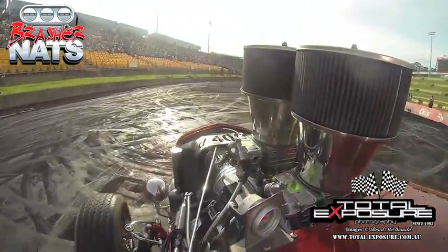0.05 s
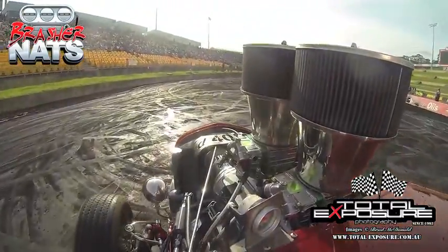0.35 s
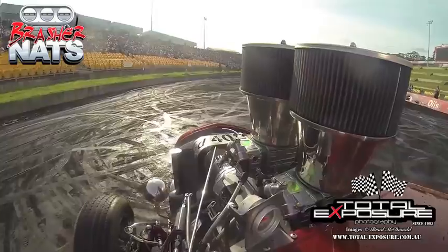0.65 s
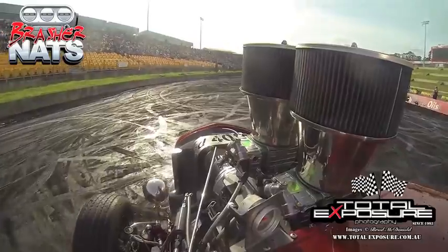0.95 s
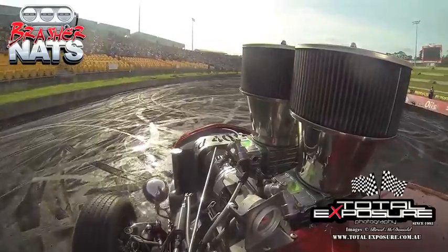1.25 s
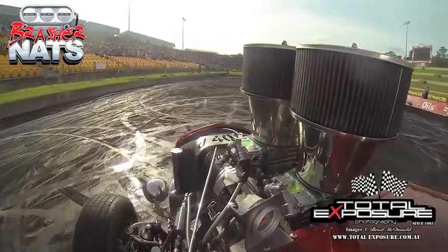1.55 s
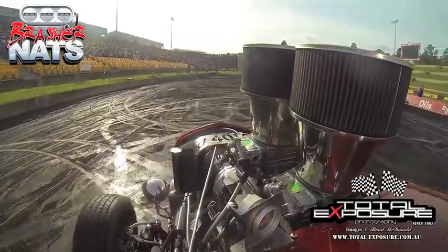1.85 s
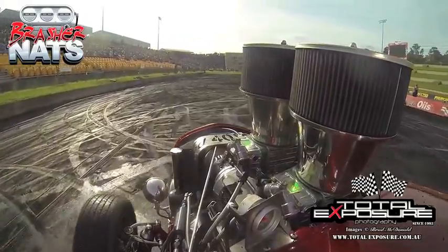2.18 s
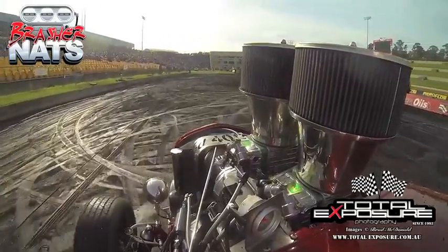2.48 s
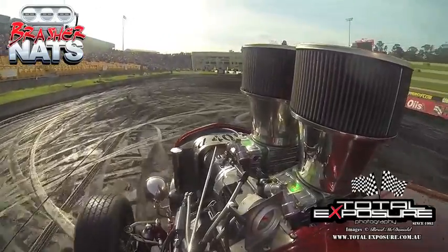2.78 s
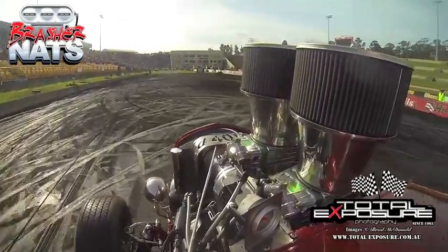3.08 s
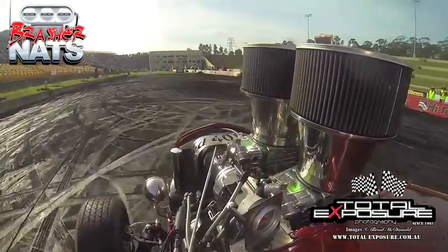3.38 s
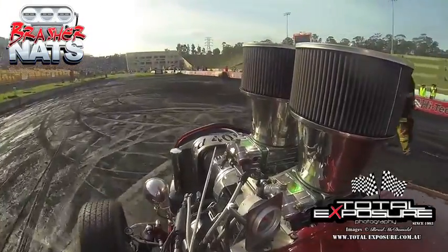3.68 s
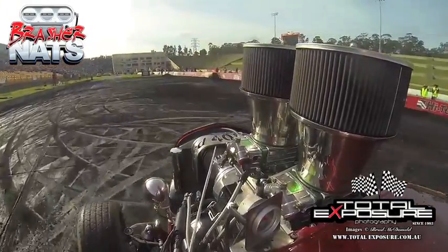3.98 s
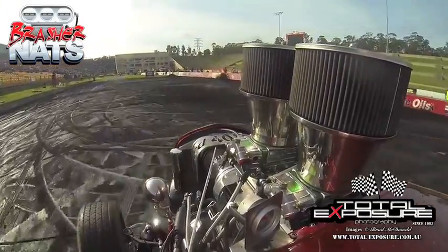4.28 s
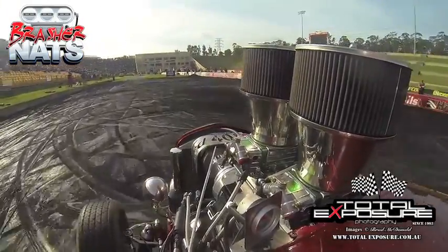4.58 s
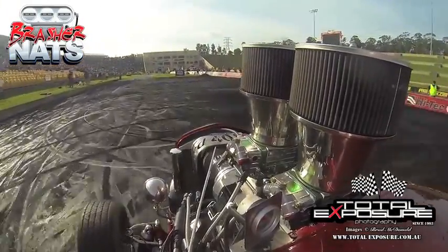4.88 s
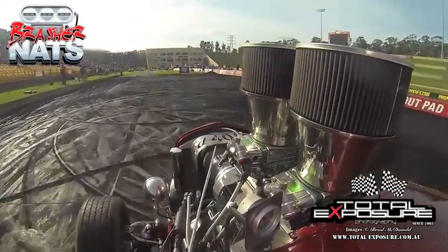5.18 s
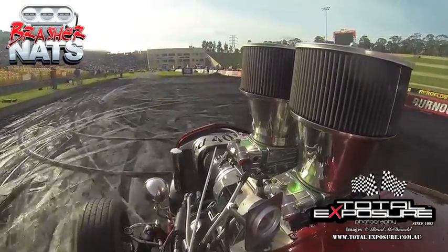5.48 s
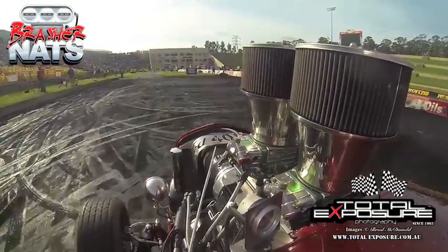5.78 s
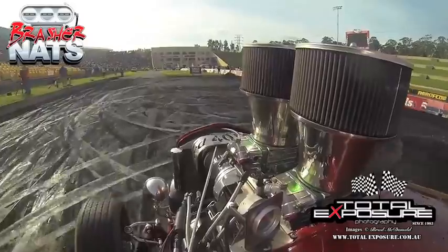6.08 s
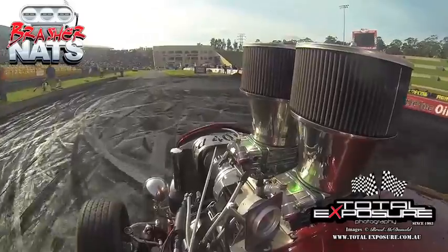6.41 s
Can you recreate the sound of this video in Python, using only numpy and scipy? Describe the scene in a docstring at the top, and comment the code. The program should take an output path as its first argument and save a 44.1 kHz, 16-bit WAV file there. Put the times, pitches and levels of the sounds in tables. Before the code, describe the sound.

A supercharged V8 drones low and muffled from on board a hot rod, under constant hollow knocking and rattling of the camera mount.

```python
"""A burnout pad, heard from a camera microphone in a closed housing on a sliding V8 hot rod.
The car's body booms and the camera sways on its arm. The housing muffles the exhaust to a low drone,
with a supercharger whine at peak revs. Right at the microphone the shaking makes the mount chatter:
hollow knocks that ring the housing, with a fine plastic crackle and clacking fittings."""
import sys
import numpy as np
from scipy import signal
from scipy.fft import rfft, irfft, next_fast_len
from scipy.io import wavfile

SR = 44100
rng = np.random.default_rng(int(sys.argv[2]) if len(sys.argv) > 2 else 0)


def file_out(sig):
    """Save sig as 16-bit WAV at sys.argv[1]."""
    # one column per channel
    cols = np.atleast_2d(sig).T
    # limit, then scale
    lim = np.clip(cols, -1, 1)
    pcm = np.round(lim * 32767).astype(np.int16)
    wavfile.write(sys.argv[1], SR, pcm)


N = 284445

# The throttle is held open in the middle and lifted twice near the end; the mount shakes with it.
# Each source adds its own trim: time_s, exhaust_db, chatter_db, crackle_db
THROTTLE = [(0, -38, -43, -54), (.42, -42, -47.5, -57.5), (1.22, -32, -39, -50), (1.4, -36.5, -40.5, -52.5),
            (2.3, -35.5, -38.5, -51), (2.6, -28, -27.5, -44.5), (2.98, -34, -34.5, -49.5),
            (3.1, -28, -32, -45), (3.62, -34.5, -35.5, -46.5), (3.86, -30, -29, -40), (4.1, -31, -35, -45),
            (4.62, -31, -29, -42.5), (4.96, -40, -54.5, -60.5), (5.27, -38.5, -65, -62.5),
            (5.295, -37.5, -40, -50), (5.57, -35.5, -40.5, -52.5), (5.72, -39.5, -55.5, -61),
            (5.88, -42.5, -54.5, -61), (6.2, -34, -38.5, -49.5), (6.45, -41.5, -53.5, -58.5)]
# hard knocks of the mount, before trim: start_s, peak_db, ring_hz
KNOCKS = [(0.1643, -26, 1335), (0.219, -25.5, 1365), (0.291, -25.5, 1436), (0.3541, -27.5, 1492),
          (0.549, -31.5, 1340), (0.4187, -28.5, 1400), (0.4585, -28, 1400), (0.6231, -27, 1352),
          (0.6722, -24.0, 1390), (0.7008, -25, 1340), (0.728, -24.5, 1350), (0.784, -29.5, 1270),
          (0.8045, -24.5, 1410), (0.872, -36, 1280), (0.908, -26.5, 1496), (0.9305, -29, 1360),
          (0.965, -29.5, 1360), (0.997, -27.5, 1358), (1.019, -26.5, 1366), (1.0457, -28, 1326),
          (1.0666, -27.5, 1380), (1.0958, -27.5, 1400), (1.123, -26.5, 1406), (1.142, -28, 1450),
          (1.1695, -26.5, 1360), (1.1988, -22, 1364), (1.2271, -27, 1440), (1.2976, -28.5, 1420),
          (1.3104, -25.5, 1400), (1.332, -27, 1410), (1.363, -32.5, 1294), (1.4192, -28, 1370),
          (1.4521, -31, 1366), (1.4731, -25.5, 1450), (1.5765, -28, 1420), (1.6036, -27, 1340),
          (1.6348, -27, 1447), (1.652, -30, 1348), (1.6824, -27, 1340), (1.711, -28, 1401),
          (1.7327, -29.5, 1380), (1.7636, -25.5, 1270), (1.7906, -28, 1416), (1.8123, -26.5, 1340),
          (1.891, -26.5, 1400), (1.9188, -25.5, 1341), (1.9398, -23.5, 1376), (1.969, -24.5, 1370),
          (1.997, -28, 1370), (2.074, -26, 1326), (2.0938, -23.5, 1460), (2.1227, -22.5, 1391),
          (2.15, -20.5, 1345), (2.168, -23.5, 1280), (2.1789, -25.5, 1450), (2.2256, -23.5, 1382),
          (2.32, -33, 1370), (2.3595, -25.5, 1347), (2.3732, -22, 1405), (2.391, -23, 1350),
          (2.4128, -18, 1311), (2.5058, -21.5, 1330), (2.5215, -22, 1430), (2.546, -19.5, 1360),
          (2.5548, -22, 1311), (2.5695, -19, 1380), (2.585, -18, 1319), (2.5922, -19.5, 1354),
          (2.622, -19.5, 1340), (2.6306, -17.5, 1305), (2.668, -18.5, 1350), (2.704, -22, 1340),
          (2.735, -13.5, 1377), (2.7505, -15.5, 1403), (2.774, -15, 1342), (2.7837, -15.5, 1336),
          (2.8241, -17.5, 1330), (2.8532, -13.5, 1340), (2.861, -26, 1340), (2.9104, -20.5, 1353),
          (2.919, -22, 1340), (2.9342, -23, 1340), (2.994, -21.5, 1386), (3.004, -23, 1293),
          (3.021, -18.5, 1348), (3.0645, -22.5, 1404), (3.0906, -17.5, 1330), (3.106, -18.5, 1340),
          (3.1161, -19.5, 1290), (3.1482, -17.5, 1412), (3.1635, -20, 1371), (3.189, -19.5, 1329),
          (3.202, -27.5, 1310), (3.2493, -16, 1365), (3.2602, -20, 1340), (3.276, -14.0, 1335),
          (3.2883, -21.5, 1360), (3.3462, -22, 1340), (3.3635, -19, 1340), (3.422, -20.5, 1380),
          (3.4308, -28, 1358), (3.45, -14, 1350), (3.4595, -16.5, 1358), (3.5381, -22, 1325),
          (3.629, -26, 1310), (3.677, -26, 1289), (3.722, -25, 1290), (3.734, -21.5, 1278),
          (3.752, -22, 1262), (3.7689, -21, 1340), (3.8167, -21.0, 1297), (3.8318, -22.5, 1327),
          (3.846, -24, 1285), (3.913, -19.5, 1270), (3.924, -20.5, 1285), (3.962, -23.5, 1332),
          (3.9913, -27, 1320), (4.01, -19.5, 1315), (4.059, -27, 1322), (4.108, -24.5, 1330),
          (4.139, -25, 1407), (4.1699, -24, 1297), (4.2046, -22, 1307), (4.2533, -23, 1382),
          (4.303, -22.5, 1247), (4.3157, -30, 1380), (4.3496, -21.5, 1308), (4.3956, -23, 1330),
          (4.441, -24, 1310), (4.483, -18.5, 1276), (4.5288, -20, 1316), (4.5396, -18.5, 1321),
          (4.5709, -28, 1302), (4.5821, -16, 1273), (4.614, -20, 1311), (4.6243, -21.5, 1343),
          (4.6564, -21, 1283), (4.8149, -26, 1415), (5.2882, -25, 1420), (5.302, -27.5, 1374),
          (5.329, -33, 1329), (5.407, -28, 1330), (5.456, -28, 1414), (5.4683, -25, 1370),
          (5.4902, -25.5, 1362), (5.512, -29, 1290), (5.5451, -26, 1323), (5.582, -28.5, 1340),
          (5.8835, -33, 1369), (5.926, -28.5, 1424), (5.9506, -29.5, 1310), (6.1442, -29.5, 1340),
          (6.163, -29, 1396), (6.1911, -25.5, 1295), (6.216, -26.5, 1334), (6.247, -28, 1350),
          (6.367, -29.5, 1282), (6.3962, -30, 1340)]
# resonances of the housing round the microphone: pitch_hz, width_hz, level_db
HOUSING_MODES = [(540, 930, -28.5), (650, 83, -27.5), (1340, 240, 15.5), (1450, 24, -14.5),
                 (2506, 86, -23.5), (2742, 100, -25.5), (4870, 680, -37)]


def undb(db):
    """Decibels to gain."""
    return 10 ** (np.asarray(db) / 20)


def unit(x):
    """Scale to rms 1."""
    return x / np.sqrt(np.mean(np.abs(x) ** 2))


def curves(table):
    """The columns of a timed table, one value a sample."""
    time_s, *columns = np.transpose(table)
    return [np.interp(np.arange(N) / SR, time_s, column) for column in columns]


def colour(x, outline):
    """Minimum-phase filter with the given outline: frequency_hz, gain_db."""
    hz, db = np.transpose(outline)
    size = next_fast_len(2 * N)
    f = np.maximum(np.fft.rfftfreq(size, 1 / SR), 1)
    gain = undb(np.interp(np.log(f), np.log(hz), db))
    cepstrum = irfft(np.log(gain), size)
    cepstrum[1:size // 2] *= 2
    cepstrum[size // 2 + 1:] = 0
    return irfft(rfft(x, size) * np.exp(rfft(cepstrum)), size)[:N]


def walk(rate_hz, size=8192):
    """Smooth random drift with spread 1, rolling off above the given rate."""
    f = np.fft.rfftfreq(size, N / SR / size)
    slow = irfft(rfft(rng.standard_normal(size)) / (1 + (f / rate_hz) ** 4))
    return np.interp(np.linspace(0, size - 1, N), np.arange(size), unit(slow))


def impulses(times, sizes):
    """One click of the given size at each time."""
    return np.bincount(np.clip(np.asarray(times) * SR, 0, N - 1).astype(int), sizes, N)


def fade(x, decay_s):
    """Let each click die away exponentially."""
    return signal.lfilter([1], [1, -np.exp(-1 / (decay_s * SR))], x)


def contacts(count, spread_db):
    """Randomly timed small contacts of uneven size."""
    when, size = rng.random((count, 2)).T
    return impulses((np.arange(count) + 2 * when) / count * N / SR, undb(-spread_db * size))


def swing(hz, rough, rate_hz):
    """A resonance kept swinging by uneven pushes: size and phase wander."""
    wander = 1 + rough * (walk(rate_hz) + 1j * walk(rate_hz))
    phase = 2 * np.pi * np.cumsum(hz * np.ones(N)) / SR
    return unit(np.real(wander * np.exp(1j * phase)))


def body(cycles, boom_trim_db=-1, rumble_db=-24, sway_trim_db=-3):
    """The body booms, throbbing once an engine cycle, over road rumble; the camera sways on its arm."""
    # main resonance of the body: time_s, pitch_hz, level_db, throb_depth (0-1)
    resonance = [(0, 78.1, -20.5, 0.13), (.2, 78.96, -23.5, .6), (.28, 79.9, -11, 0),
                 (.52, 78.96, -16.5, 0.46), (.7, 76.42, -18, 0.45), (1.0, 82.51, -16, 0.72),
                 (1.26, 73.44, -22.5, 1), (1.36, 91.94, -15, 0), (1.52, 92.4, -16.5, 0.58),
                 (1.64, 77.6, -16.5, 0.4), (1.92, 80.34, -21, 1), (2.35, 79.85, -15.5, 0.72),
                 (2.54, 84.2, -23.5, 0.58), (2.66, 79.08, -17, 0.59), (3.72, 79, -17, 0.31),
                 (3.86, 78.16, -21.5, 0.99), (4.75, 80, -29, 0.54), (5.02, 87.04, -17, .3),
                 (5.17, 70.1, -13.5, .15), (5.55, 87.66, -17.5, 0.32), (5.7, 86, -18.5, 0.54),
                 (5.86, 74.86, -15, .2), (6.45, 78, -19.5, 0.83)]
    # swaying of the camera: time_s, level_db
    sway_levels = [(0.0, -13), (0.58, -27.5), (1.26, -15), (1.5, -27), (1.64, -18.5), (1.76, -22.5),
                   (1.96, -12), (2.08, -19.5), (2.58, -15.5), (2.68, -18.5), (3.4, -22), (4.78, -10.5),
                   (5.1, -23), (5.78, -14), (6.0, -29), (6.45, -13.5)]
    # tone of the steady road rumble: frequency_hz, gain_db
    rumble_tone = [(10, -28), (30, -26), (45, -4.5), (62, 5.5), (100, 6.5), (118, 0), (150, -12),
                   (250, -19), (600, -67), (4000, -100)]
    boom_hz, boom_db, throb = curves(resonance)
    boom = swing(boom_hz, rough=.25, rate_hz=18) * undb(boom_db + boom_trim_db)
    boom *= 1 + throb * np.cos(2 * np.pi * cycles)
    sway = swing(hz=28.5, rough=1, rate_hz=9.8) * undb(curves(sway_levels)[0] + sway_trim_db)
    rumble = unit(colour(rng.standard_normal(N), rumble_tone)) * undb(rumble_db)
    return boom + rumble + sway


def firings(cycles, cylinders=8):
    """Time and cylinder of every firing: each cylinder fires once a four-stroke cycle."""
    number = np.floor(cycles * cylinders).astype(int)
    at = np.flatnonzero(np.diff(number))
    return at / SR, number[at] % cylinders


def exhaust(times, cylinder, bank_lag_s=.0011, jitter_s=.00025, scatter_db=6, gas_db=-2, trim_db=-2):
    """Uneven firings from two banks, each with a puff of gas, dulled by the housing."""
    # strength of the eight firings of a cycle: level_db
    firing_db = [1.5, 4, 1, -16.5, 5.5, -1.5, 1, 3]
    # side of each firing: bank (1 is the far one, with longer pipes)
    banks = [0, 1, 1, 0, 1, 0, 0, 1]
    # the exhaust from inside the housing: frequency_hz, gain_db
    muffled = [(60, -27.5), (120, -10.5), (150, -2), (180, 1), (240, -8.5), (290, -7.5), (340, -4),
               (420, -14), (560, -10.5), (640, -16), (710, -14.5), (820, -34.5), (1100, -32.5),
               (2000, -31.5), (5000, -62), (14000, -84)]
    late, size = rng.standard_normal((N // 100, 2))[:len(times)].T
    arrival_s = times + bank_lag_s * np.take(banks, cylinder) + jitter_s * late
    pulses = impulses(arrival_s, undb(np.take(firing_db, cylinder) + scatter_db * np.minimum(size, 1)))
    gas = fade(pulses, decay_s=.006) * rng.standard_normal(N)
    thuds = unit(colour(pulses - pulses.mean(), muffled))
    puffs = undb(gas_db) * unit(colour(gas, muffled))
    return unit(thuds + puffs) * undb(curves(THROTTLE)[0] + trim_db)


def drone(cycles, cycle_hz, restless, waver_db=3.5, trim_db=-.5, rough=1.41):
    """Engine orders come through the chassis, swell in its resonances and growl at restless revs."""
    # engine orders: cycle_multiple, level_db
    orders = [(2, -4), (3, -5), (4, -8), (5, -8), (6, -14), (8, -26), (9, -22), (10, -24), (13, -19),
              (14, -26), (15, -28), (16, -21), (18, -28), (28, -30), (35, -31)]
    # chassis resonances: centre_hz, width_hz, lift_db
    chassis = [(104.7, 7.6, 19), (320, 45, 8)]
    tones = 0
    for k, db in orders:
        lift_db = sum(lift * np.exp(-((k * cycle_hz - hz) / width) ** 2) for hz, width, lift in chassis)
        phase = 2 * np.pi * (k * cycles + rng.random()) + rough * restless ** 2 * walk(32)
        tones += undb(db + lift_db + waver_db * walk(6.2)) * np.sin(phase)
    return tones * undb(curves(THROTTLE)[0] + trim_db)


def supercharger(cycles, waver_db=2, rough=.31):
    """The supercharger whines on high multiples of the cycle rate, arching with the revs."""
    # tones of the whine: cycle_multiple, level_db
    orders = [(40, -11), (45, -9), (50, -7), (53, -2), (57, 0), (59, -5), (62, -7)]
    # its swell at peak revs: time_s, level_db
    swell = [(2.3, -70), (3.7, -47), (4.35, -46), (4.58, -32.5), (4.8, -40), (5.1, -70)]
    tones = 0
    for k, db in orders:
        gain = undb(db + waver_db * walk(9))
        phase = 2 * np.pi * (k * cycles + rng.random()) + rough * walk(25)
        tones += gain * np.sin(phase)
    return unit(tones) * undb(curves(swell)[0])


def jolts(times, cylinder, scatter_db=4, slack_s=.00016):
    """The firings throw the loose mount against its stop in a limping pattern, cycle after cycle."""
    # push of each of the eight firings: level_db
    jolt_db = [0, -10, -6, -2, -11, -1, -9, -4]
    late, size = rng.standard_normal((N // 100, 2))[:len(times)].T
    level_db = np.take(jolt_db, cylinder) + scatter_db * np.minimum(size, 1)
    return impulses(times + slack_s * late, undb(level_db))


def free_flight(before_s=.01, after_s=.0038, dip_db=-12):
    """Before a hard knock the mount flies free of its stop: a gain that dips until just after it."""
    knock_s = np.transpose(KNOCKS)[0]
    t = np.arange(N) / SR
    nearest = np.searchsorted((knock_s[1:] + knock_s[:-1]) / 2, t)
    since_s = t - knock_s[nearest]
    width_s = np.where(since_s < 0, before_s, after_s)
    return undb(dip_db * np.exp(-(since_s / width_s) ** 2))


def tinkle(strikes, scrape_s=.0018, ring_s=.002):
    """Small metal parts are scraped briefly by each strike and ring, a little differently every time."""
    # modes of the loose fittings: pitch_hz, level_db
    modes = [(1900, -8), (2500, -9.5), (2730, -11), (3180, -3), (4100, -14), (5260, -9), (7550, -14),
             (8300, -19), (10900, -25)]
    push = fade(strikes, scrape_s) * rng.standard_normal(N) * np.sqrt(2 / (scrape_s * SR))
    ringing = 0
    for hz, db in modes:
        pole = np.exp((2j * np.pi * hz - 1 / ring_s) / SR)
        ringing += undb(db) * signal.lfilter([pole.imag], [1, -2 * pole.real, abs(pole) ** 2], push)
    return ringing


def fittings(crack_db=-3, crack_s=.0046, ring_db=-8, shaken_db=-22, stray_db=-1):
    """Loose fittings clack on the housing and ring; knocks and stray contacts make them tinkle."""
    # clacks on the housing: start_s, strength_db
    hits = [(0.0724, -42), (0.092, -42), (0.2186, -33.5), (0.253, -40), (0.2794, -41.5), (0.308, -47.5),
            (0.349, -45), (0.3834, -42), (0.4587, -42), (0.4864, -41.5), (0.652, -40), (0.75, -37.5),
            (0.8984, -43), (0.9198, -41.5), (1.1049, -47), (1.2638, -36.5), (1.474, -41), (1.6534, -39),
            (1.7598, -38.5), (1.9878, -46), (2.228, -38), (2.2535, -34.5), (2.749, -40), (2.87, -36),
            (3.0488, -38), (3.1744, -36), (3.2988, -40), (3.4873, -33.5), (3.4948, -34), (3.7713, -35),
            (4.0354, -31), (4.3206, -38), (5.001, -45.5), (5.0362, -42.5), (5.1251, -44), (5.1443, -41),
            (5.2483, -44.5), (5.3274, -35.5), (5.3687, -38.5), (5.7179, -42), (5.7354, -38.5),
            (5.7523, -44), (5.8483, -48), (5.8677, -46), (5.8879, -38.5), (5.9561, -38.5), (6.0664, -41),
            (6.2234, -41), (6.2558, -36.5), (6.3365, -37)]
    # tone of their dry crack: frequency_hz, gain_db
    crack_tone = [(500, -7), (1800, 2.5), (2400, -7), (3400, -6), (6300, -17), (7500, -23.5), (13000, -36)]
    clack_s, clack_db = np.transpose(hits)
    clacks = impulses(clack_s, undb(clack_db))
    noise = rng.standard_normal(N)
    contact = signal.oaconvolve(clacks, np.hanning(int(crack_s * SR)))[:N]
    cracks = colour(contact * noise, crack_tone) / np.std(colour(noise, crack_tone))
    knock_s, knock_db, _ = np.transpose(KNOCKS)
    shaken = impulses(knock_s + .002, undb(knock_db + shaken_db))
    stray = contacts(count=500, spread_db=13) * undb(curves(THROTTLE)[2] + stray_db)
    return undb(crack_db) * cracks + tinkle(undb(ring_db) * clacks + shaken + stray)


def crackle(taps, trim_db=2, grit_db=-7, hiss_db=-13, rasp_db=-35, rasp_growth=.52, dull_hz=8000):
    """Plastic rasps dully at every tap and knock, with fine bright grit in between."""
    # tone of the rubbing plastic: frequency_hz, gain_db
    plastic = [(300, -16.5), (800, 4), (1050, 6.5), (1550, 11), (1750, -3.5), (2150, -5.5), (2500, 1.5),
               (2900, -6.5), (3150, -6), (4400, -10.5), (5300, -7.5), (6200, -12), (7800, -15.5),
               (13300, -25), (15000, -42.5)]
    shaking = undb(curves(THROTTLE)[2] + trim_db)
    tap_rasp = (unit(fade(taps, decay_s=.013)) + undb(hiss_db)) * shaking
    knock_s, knock_db, _ = np.transpose(KNOCKS)
    blows = impulses(knock_s + .00078, undb(rasp_growth * knock_db + rasp_db))
    knock_rasp = fade(blows, decay_s=.014)
    grains = unit(fade(contacts(count=520, spread_db=24), decay_s=.0008))
    rasp_noise, grit_noise = rng.standard_normal((2, N))
    rasp = signal.lfilter(*signal.butter(1, dull_hz, fs=SR), np.hypot(tap_rasp, knock_rasp) * rasp_noise)
    grit = undb(grit_db) * grains * shaking * grit_noise
    return colour(rasp + grit, plastic) / np.std(colour(rasp_noise, plastic))


def housing_ring(ring_hz, weights_db=0, contact_s=.0053, unshifted_hz=1340):
    """One soft-edged blow on the housing, peak 1; where it lands shifts and weights the resonances."""
    hz, width_hz, db = np.transpose(HOUSING_MODES)
    t = np.arange(SR // 25) / SR
    decays = np.exp(-np.pi * np.outer(width_hz, t))
    modes = decays * np.sin(2 * np.pi * np.outer(hz * ring_hz / unshifted_hz, t))
    onset = 1 - np.exp(-(t / contact_s) ** 2)
    sound = (width_hz * undb(db + weights_db)) @ modes * onset
    return sound / np.abs(sound).max()


def chatter(taps, trim_db=-5, centre_hz=1360, spread_hz=110, pivot_db=-37, spots_per_db=.13, spots=5):
    """Taps strike and scrape a few spots on the housing, ringing higher when the chatter is lighter."""
    chatter_db = curves(THROTTLE)[1]
    shift = spots_per_db * (pivot_db - chatter_db)
    spot = np.clip(np.floor(spots * rng.random(N) + shift), 0, spots - 1)
    ringing = 0
    for k, ring_hz in enumerate(centre_hz + spread_hz * np.linspace(-1, 1, spots)):
        blows = taps * (spot == k)
        scrapes = .03 * fade(blows, decay_s=.003) * rng.standard_normal(N)
        ringing += signal.oaconvolve(blows + scrapes, housing_ring(ring_hz))[:N]
    return unit(ringing) * undb(chatter_db + trim_db)


def knocks(trim_db=-.4, rebound_db=-16, rebound_s=.0097, return_db=-16, return_s=.0095, vary_db=3):
    """Each hard knock rings the housing a little differently, rebounds and strikes again lightly."""
    track = np.zeros(N + SR)
    for start_s, peak_db, ring_hz in KNOCKS:
        bounce_s = rebound_s * np.exp(.37 * rng.standard_normal())
        weights_db = vary_db * rng.standard_normal(len(HOUSING_MODES))
        knock = undb(peak_db + trim_db) * housing_ring(ring_hz, weights_db)
        for delay_s, db in ((0, 0), (bounce_s, rebound_db), (return_s, return_db)):
            track[int((start_s + delay_s) * SR):][:len(knock)] += undb(db) * knock
    return track[:N]


def scene(free_spin_flutter=.04, bout_db=8.26):
    """Engine, body and mount, all at the one on-board microphone."""
    # engine speed in four-stroke cycles: time_s, cycle_hz, flutter_share
    revs = [(0, 18.4, .04), (.35, 19.8, .04), (1.0, 19.5, .04), (1.35, 18.4, .04), (1.7, 19.4, .04),
            (2.25, 19.6, .04), (2.55, 21.7, .015), (3.05, 23.5, .012), (3.4, 22.8, .009), (4.0, 20.4, .004),
            (4.28, 20.7, .004), (4.42, 22.35, .002), (4.63, 23.6, .002), (4.82, 23.3, .003),
            (5.2, 17.8, .04), (5.4, 19.3, .04), (5.8, 18.5, .04), (6.45, 19.5, .04)]
    cycle_hz, flutter = curves(revs)
    # the revs flutter as the spinning tyres grip and let go
    cycles = np.cumsum(cycle_hz * (1 + flutter * walk(14))) / SR
    times, cylinder = firings(cycles)
    restless = (flutter / free_spin_flutter) ** .39
    # the swaying camera pinches and frees the mount: random bouts, stronger at restless revs
    bouts = undb(bout_db * restless * np.tanh(walk(100)))
    taps = jolts(times, cylinder) * bouts
    seated = free_flight()
    engine = exhaust(times, cylinder) + drone(cycles, cycle_hz, restless) + supercharger(cycles)
    mount = knocks() + chatter(taps * seated) + crackle(taps * bouts * np.sqrt(seated)) + fittings()
    return (body(cycles) + engine + mount)[None]


def record(dry, low_cut_hz=14, top_hz=14500):
    """The camera's microphone drops the deepest sway and cuts the top."""
    sound = signal.sosfilt(signal.butter(2, low_cut_hz, "high", fs=SR, output="sos"), dry)
    return signal.sosfilt(signal.ellip(8, .2, 70, top_hz, fs=SR, output="sos"), sound)


dry = scene()
out = record(dry)
file_out(out)
```